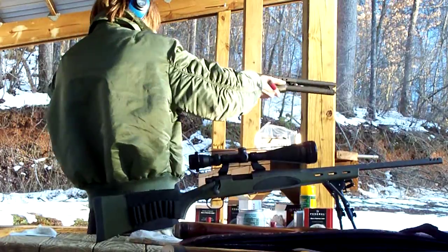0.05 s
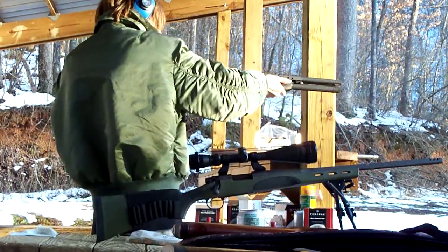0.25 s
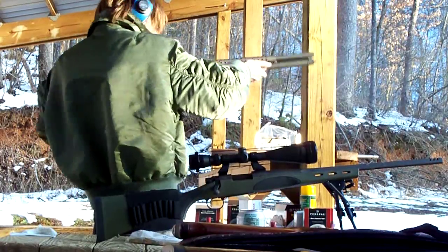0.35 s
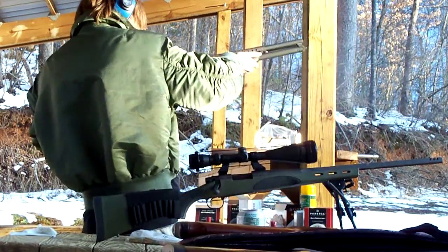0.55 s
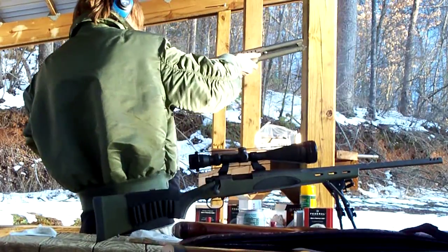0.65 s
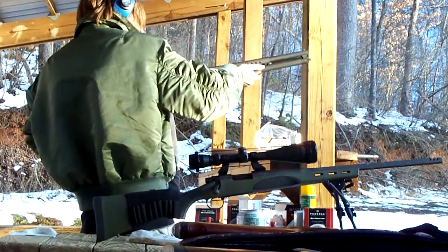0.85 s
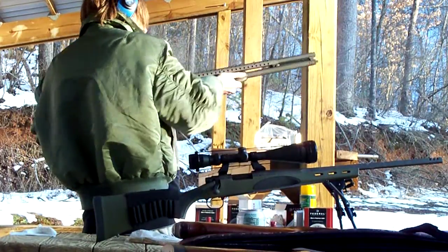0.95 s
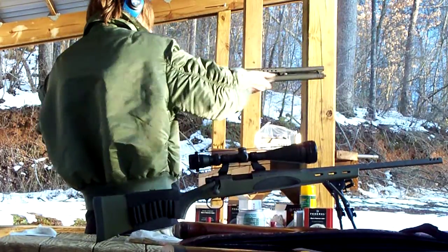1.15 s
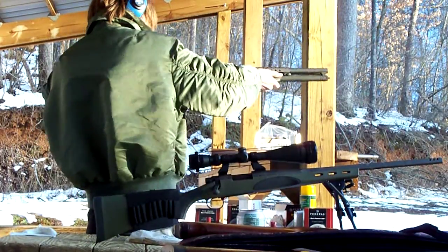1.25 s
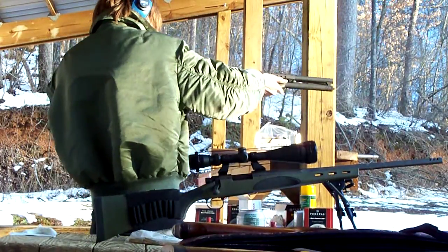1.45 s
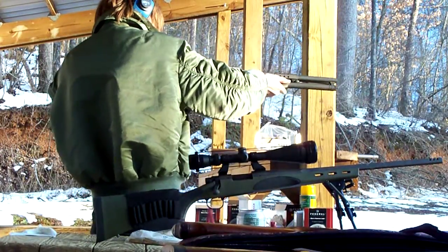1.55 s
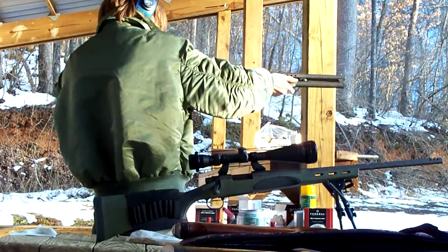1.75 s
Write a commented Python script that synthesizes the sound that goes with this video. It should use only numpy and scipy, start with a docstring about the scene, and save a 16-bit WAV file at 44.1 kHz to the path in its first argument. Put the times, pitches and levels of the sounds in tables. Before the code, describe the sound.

A loud handgun shot echoes through woods, followed by metallic clacks of gun handling.

```python
"""The echo of an earlier shot is fading in snowy woods when a handgun fires under a range's wooden roof.
A bright crack and a dense blast overload the small microphone, and the shelter rings briefly.
The wooded slope answers with slaps from trunks and banks, a low roll and a long, darkening echo.
Then the gun is handled: steel slides into two metallic clacks, followed by a dull knock and a bright click."""
import sys
import numpy as np
from scipy import signal
from scipy.fft import rfft, irfft, next_fast_len
from scipy.io import wavfile
from scipy.ndimage import map_coordinates

SR = 44100
rng = np.random.default_rng(int(sys.argv[2]) if len(sys.argv) > 2 else 0)


def persist_wave(psi):
    """Save psi, clipped to +-1, as 16-bit WAV."""
    counts = np.round(np.clip(psi, -1, 1) * 32767).astype(np.int16)
    wavfile.write(sys.argv[1], SR, np.atleast_2d(counts).T)


N = 79380

SHOT_S, BLAST_RISE_S = 0.2437, 0.0027
TREE_KNOTS_PER_S, TREE_SWING_DB = 90, 1.05  # uneven returns from the trunks
CLICK_T60_S, ROOF_DB, ROOF_T60_S = 0.018, -10, 0.23

# tone curves of the sources and the microphone (frequency [Hz], gain [dB])
AIR_EQ = [(25, 0), (500, -7), (2000, -7.5), (6500, -13.5), (9000, -28)]
EARLIER_ECHO_EQ = [(25, -19.5), (70, -31.5), (150, -15), (300, 0), (500, 3.5), (1000, -3), (2200, -15.5),
                   (3500, -32.5), (6800, -38.5), (9000, -50)]
ROLL_EQ = [(25, -36.5), (65, -34), (100, -2.5), (170, 2.5), (260, 2), (600, -41), (2000, -90)]
WOODS_EQ = [(25, -34), (65, -45.5), (110, -21), (200, -10), (330, 1), (550, 3.5), (1000, 0.5), (1500, -7),
            (2300, -10), (3300, -23), (6500, -31), (9000, -40.5)]
SLAP_EQ = [(40, -39), (150, -17.5), (350, -1.5), (700, 2), (1200, -6.5), (2500, -20.5), (6000, -36.5)]
CLACK_EQ = [(300, -35), (1500, -14), (2700, 0), (3800, -7.5), (5200, -1), (6600, 3), (8000, -1.5),
            (9500, -5.5)]
TICK_EQ = [(300, -29), (1500, -9), (3000, -9.5), (5000, -9), (6300, 1.5), (8000, -2), (9500, -3.5)]
KNOCK_EQ = [(150, -24), (500, -8), (1200, -1.5), (1700, -4), (2200, -1.5), (2800, -21), (5000, -24),
            (9000, -40)]
CRACK_EQ = [(300, -40), (2000, -17), (6000, 7), (9000, 13.5)]
BLAST_EQ = [(25, -32.5), (65, -40), (110, -16), (200, -9.5), (260, -1), (330, 0.5), (450, 0.5), (1000, 4.5),
            (2100, 1), (3200, -11), (5200, -11), (7000, -8), (9000, -17.5)]
MIC_EQ = [(20, -20.5), (100, 1), (3500, 2), (4000, -9), (4220, -16.5), (4450, -7.5), (4900, 0.5),
          (7700, 4.5), (8400, -7), (8900, -20), (9400, -55), (10500, -68)]
# fader curves of the three echo beds (time [s], level [dB])
EARLIER_ECHO_FADER = [(0, -33), (.04, -38), (.2, -41.5), (.235, -43.5), (.8, -56.5), (1.8, -84)]
ROLL_FADER = [(.25, -42), (.40, -39.5), (.47, -40.5), (.54, -47), (.7, -57.5), (.9, -54), (1.1, -69),
              (1.8, -78)]
WOODS_FADER = [(.25, -23), (.5, -34), (.58, -32), (.63, -31), (.72, -33.5), (.83, -33), (.95, -35),
               (1.1, -33.5), (1.18, -36.5), (1.3, -37.5), (1.5, -43), (1.63, -43), (1.8, -45)]
# distinct slaps from trunks and banks (time [s], peak [dB])
SLAP_CUES = [(.480, -20.5), (.522, -24), (.551, -18), (.594, -18), (.6245, -16.5), (.627, -17),
             (.677, -19.5), (.764, -23.5), (.793, -20.5)]
# steel pressing on steel (start [s], end [s], start level [dB], end level [dB])
SLIDE_CUES = [(.850, .906, -49, -36), (1.077, 1.11, -50, -36.5)]
# contacts of the gun's parts (time [s], steel clack [dB], light tick [dB], dull knock [dB])
CONTACT_CUES = [(.851, -56, -42, -61), (0.9033, -22.5, -57, -30), (0.9098, -16, -36, -32.5),
                (0.917, -26, -25, -35), (1.08, -54, -35.5, -51), (1.107, -42, -32, -50),
                (1.129, -27, -24, -46), (1.1354, -20, -35, -55), (1.1397, -32, -21.5, -50),
                (1.497, -63, -66, -29), (1.503, -46, -68.5, -59), (1.582, -64, -28, -63),
                (1.59, -59, -27, -56), (1.769, -57, -56.5, -54)]
# resonances of the steel parts (frequency [Hz], width [Hz], lift [dB])
STEEL_RESONANCES = [(2097, 79, 12), (4920, 88, 1.5), (6230, 160, 4.5), (6690, 41, 8), (7140, 82, 7),
                    (7700, 74, -1), (8190, 73, 6.5)]
# ring of the gun's body and of the shelter (frequency [Hz], level [dB], T60 [s])
BODY_RING = [(1226, 0, 0.14), (2022, -3.5, 0.12), (2334, -11, 0.19), (3160, -16, .15), (4520, -19, .12),
             (6330, -20, .13)]
SHELTER_RING = [(105, -19, 0.2), (296.9, -18, 0.5), (362.6, -14.5, .35), (389, -28, .6)]
# the report coming back from the shelter's walls (time [s], level [dB])
NEAR_RETURNS = [(0.267, -14.5), (0.281, -3.5), (0.291, -2), (.311, -5), (0.322, -6.5), (.332, -4),
                (0.342, -5), (0.346, -20)]
# instants when the overloaded microphone chokes (time [s], half length [s], depth [dB])
MIC_CHOKES = [(0.264, 0.0034, 12), (0.298, 0.00074, 22), (0.3064, 0.00059, 29), (.3185, .0015, 8),
              (0.329, 0.00054, 3.5)]


def amp(db):
    """Decibels to gain."""
    return 10 ** (np.asarray(db) / 20)


def eq_db(eq, hz):
    """A tone curve read on a log frequency axis."""
    knots_hz, db = np.transpose(eq)
    return np.interp(np.log(hz + 1), np.log(knots_hz + 1), db)


def since(s):
    """Seconds since s, zero before it."""
    return np.maximum(np.arange(N) / SR - s, 0)


def fader_db(points):
    """A fader curve read at every sample."""
    return np.interp(since(0), *np.transpose(points))


def strike(s, t60, rise=.0003):
    """Hit envelope: quick attack at s, exponential decay."""
    t = since(s)
    return (1 - np.exp(-t / rise)) * amp(-60 * t / t60)


def coloured(x, eq):
    """Minimum-phase EQ, so nothing rings ahead of a hit."""
    size = 2 * next_fast_len(N)
    cepstrum = irfft(np.log(amp(eq_db(eq, np.fft.rfftfreq(size, 1 / SR)))), size)
    cepstrum[1:size // 2] *= 2
    cepstrum[size // 2 + 1:] = 0
    return irfft(rfft(x, size) * np.exp(rfft(cepstrum)), size)[:N]


def noise(eq, resonances=()):
    """Fresh noise of rms 1 with the given tone and resonances."""
    f = np.fft.rfftfreq(N, 1 / SR)
    peaks_db = sum(lift / (1 + (2 * (f - hz) / width) ** 2) for hz, width, lift in resonances)
    x = irfft(rfft(rng.standard_normal(N)) * amp(eq_db(eq, f) + peaks_db), N)
    return x / np.sqrt(np.mean(x ** 2) + 1e-20)


def wobble(knots_per_s):
    """A smooth random curve."""
    return map_coordinates(rng.standard_normal(N // 16), [since(0) * knots_per_s], mode="mirror")


def air(level_db=-69.5):
    """A quiet bed of outdoor hiss."""
    return amp(level_db) * noise(AIR_EQ)


def earlier_echo():
    """The tail of an earlier shot rolls away among the trunks."""
    wash = noise(EARLIER_ECHO_EQ)
    return wash * amp(fader_db(EARLIER_ECHO_FADER) + TREE_SWING_DB * wobble(TREE_KNOTS_PER_S))


def roll():
    """The bass of the shot rolls back from the slope."""
    return noise(ROLL_EQ) * amp(fader_db(ROLL_FADER)) * (since(SHOT_S) > 0)


def woods(loss_db_per_s_khz=5, neutral_s=0.8):
    """Countless returns from the trees, duller as their path through the air grows."""
    hz, t, spectrum = signal.stft(noise(WOODS_EQ), SR, nperseg=256)
    extra_path_s = (t - neutral_s).clip(-.3, 1)  # brighter than WOODS_EQ before neutral_s, darker after
    tilt = amp(-loss_db_per_s_khz * hz[:, None] / 1000 * extra_path_s)
    wash = signal.istft(spectrum * tilt, SR, nperseg=256)[1][:N]
    level_db = fader_db(WOODS_FADER) + TREE_SWING_DB * wobble(TREE_KNOTS_PER_S)
    return wash * amp(level_db) * (since(SHOT_S) > 0)


def slaps(scatter_db=-28.5, t60=0.026):
    """Single hard surfaces send back a dulled pressure pulse with a short scattered tail."""
    scatter = amp(scatter_db) * rng.standard_normal(N)
    pulses = sum(amp(db) * (signal.unit_impulse(N, round(s * SR)) + scatter * strike(s, t60))
                 for s, db in SLAP_CUES)
    pulse_peak = np.abs(coloured(signal.unit_impulse(N), SLAP_EQ)).max()
    return coloured(pulses, SLAP_EQ) / pulse_peak


def slides(grip_db=3, grip_knots_per_s=220):
    """Steel scrapes unevenly on steel, pressing harder toward each clack, then dies under the roof."""
    t = since(0)
    push = sum(amp(np.interp(t, [start, end], [start_db, end_db]) - 60 * since(end) / ROOF_T60_S)
               * (t > start) for start, end, start_db, end_db in SLIDE_CUES)
    return noise(TICK_EQ, STEEL_RESONANCES) * push * amp(grip_db * wobble(grip_knots_per_s))


def contact_envelope(times, levels_db):
    """Short hits, each answered by the roof, summed in power."""
    power = np.zeros(N)
    for s, db in zip(times, levels_db):
        roof = amp(ROOF_DB) * strike(s, ROOF_T60_S, rise=0.0026)
        power += amp(db) ** 2 * (strike(s, CLICK_T60_S) ** 2 + roof ** 2)
    return np.sqrt(power)


def handling(ring_db=-9):
    """Each contact excites the steel parts and the body of the gun in its own blend."""
    times, clacks_db, ticks_db, knocks_db = np.transpose(CONTACT_CUES)
    ring = sum(amp(knock_db + db) * np.sin(2 * np.pi * (hz * since(s) + rng.random())) * strike(s, t60)
               for s, knock_db in zip(times, knocks_db) for hz, db, t60 in BODY_RING)
    clack = noise(CLACK_EQ, STEEL_RESONANCES) * contact_envelope(times, clacks_db)
    tick = noise(TICK_EQ, STEEL_RESONANCES) * contact_envelope(times, ticks_db)
    knock = noise(KNOCK_EQ) * contact_envelope(times, knocks_db)
    return clack + tick + knock + amp(ring_db) * ring


def shot(crack_db=-2.5, blast_db=-3):
    """A bright crack, then the blast fills the shelter, bounces back from nearby and leaves a low ring."""
    crack = amp(crack_db) * noise(CRACK_EQ) * strike(SHOT_S, t60=0.12)
    blast = amp(blast_db) * noise(BLAST_EQ) * strike(SHOT_S, t60=0.42, rise=BLAST_RISE_S)
    bounces = sum(amp(db) * strike(s, t60=.03, rise=BLAST_RISE_S) for s, db in NEAR_RETURNS)
    ring = sum(amp(db) * np.sin(2 * np.pi * hz * since(SHOT_S)) * strike(SHOT_S, t60, rise=.015)
               for hz, db, t60 in SHELTER_RING)
    return crack + blast + noise(BLAST_EQ) * bounces + ring


def scene():
    """The mono mix that reaches the microphone."""
    low_cut = signal.butter(2, 300, "high", fs=SR, output="sos")  # the small parts radiate no bass
    gun_parts = signal.sosfilt(low_cut, handling() + slides())
    return (shot() + woods() + slaps() + roll() + earlier_echo() + gun_parts + air())[None]


def record(dry, overload_db=-6, ceiling_db=-3, top_hz=15800):
    """The microphone chokes, saturates and colours the sound; the recorder clips and trims the top."""
    choke_db = sum(depth * np.exp(-((since(0) - s) / half) ** 2) for s, half, depth in MIC_CHOKES)
    saturated = amp(overload_db) * np.tanh(dry[0] * amp(-choke_db) / amp(overload_db))
    mic = coloured(saturated, MIC_EQ)
    clipped = mic / (1 + np.abs(mic / amp(ceiling_db)) ** 16) ** (1 / 16)  # tight knee
    high_cut = signal.ellip(12, .1, 100, top_hz, fs=SR, output="sos")
    return signal.sosfilt(high_cut, clipped)[None]


dry = scene()
out = record(dry)
persist_wave(out)
```